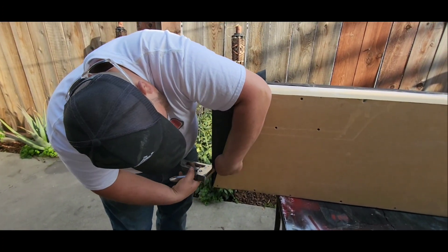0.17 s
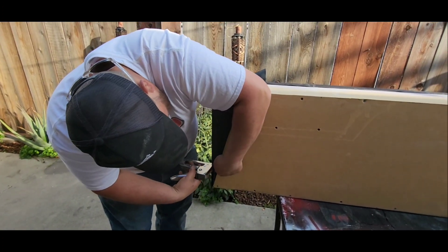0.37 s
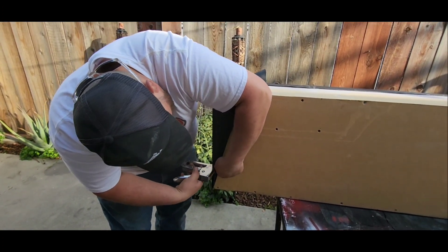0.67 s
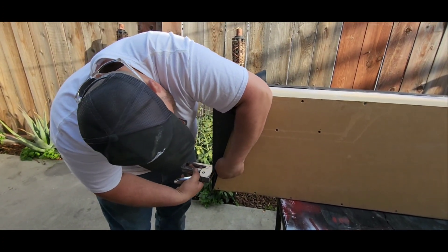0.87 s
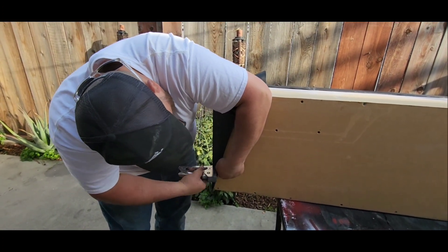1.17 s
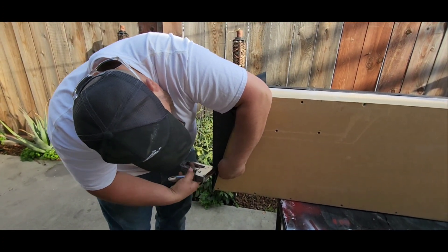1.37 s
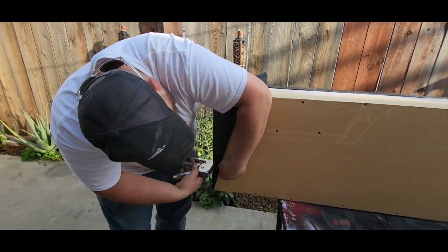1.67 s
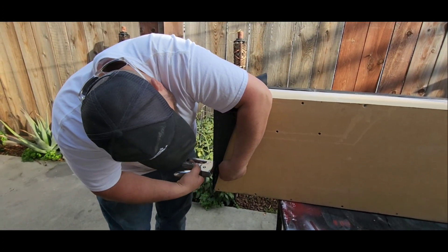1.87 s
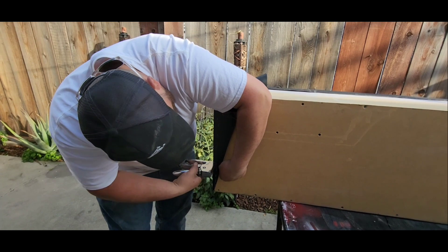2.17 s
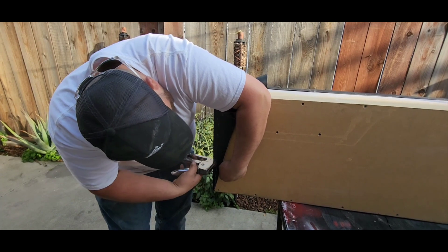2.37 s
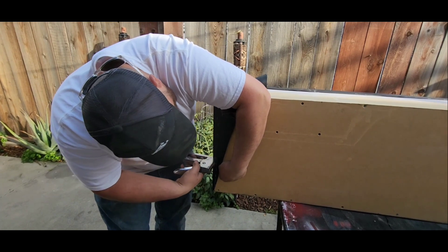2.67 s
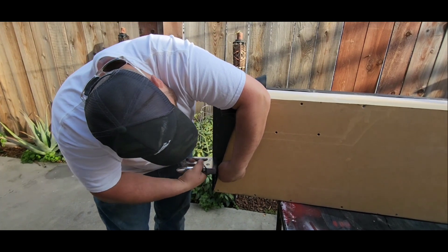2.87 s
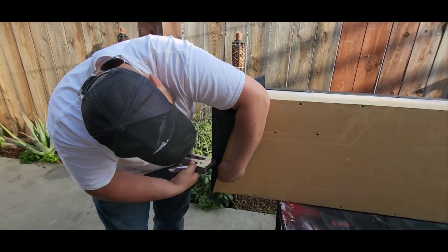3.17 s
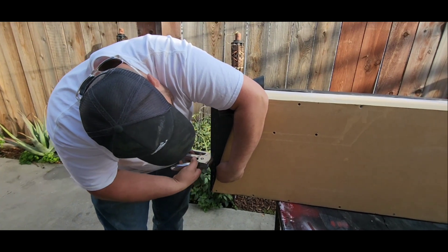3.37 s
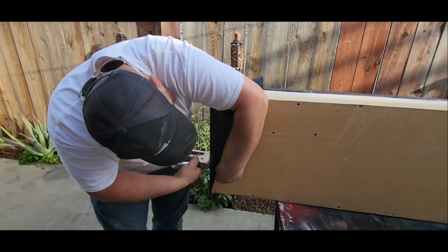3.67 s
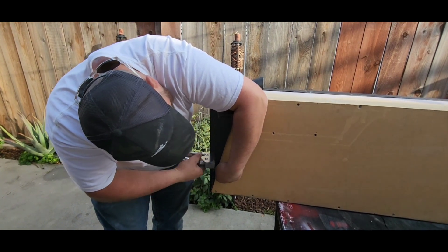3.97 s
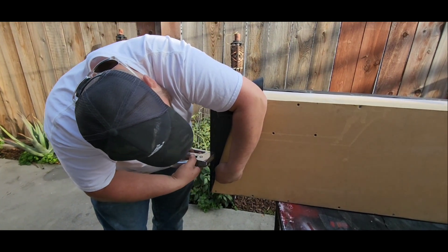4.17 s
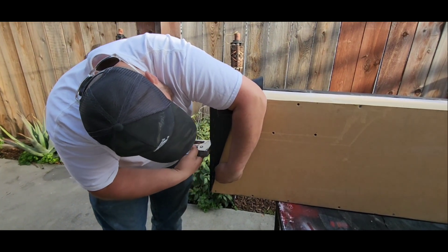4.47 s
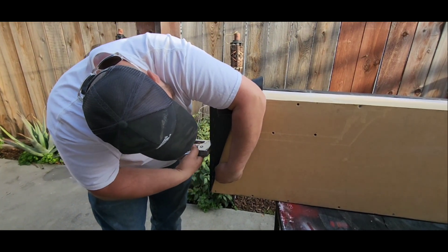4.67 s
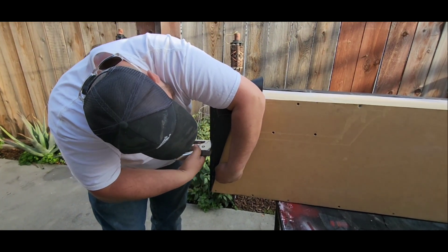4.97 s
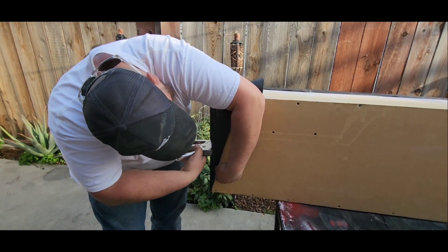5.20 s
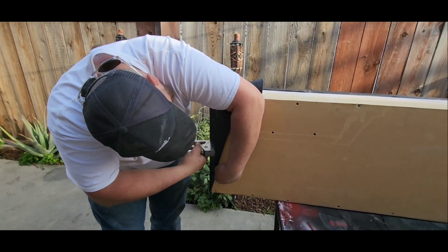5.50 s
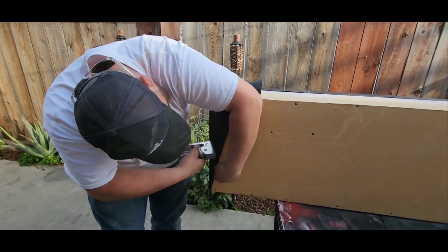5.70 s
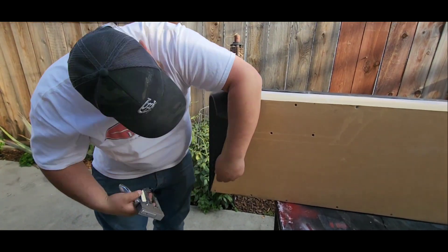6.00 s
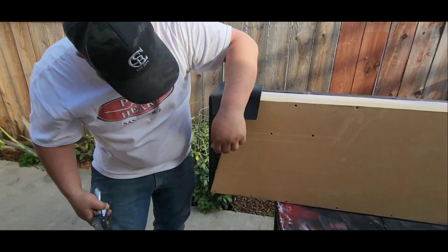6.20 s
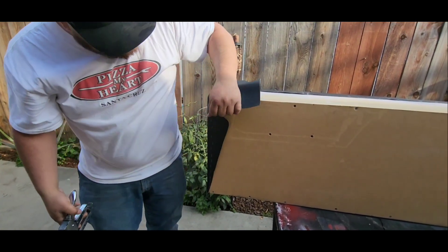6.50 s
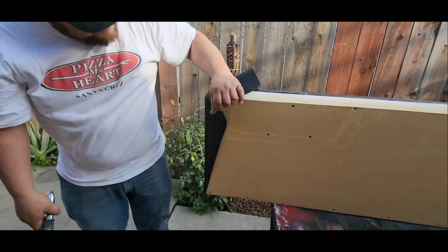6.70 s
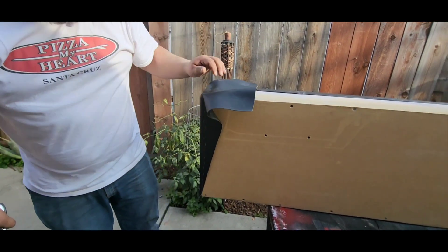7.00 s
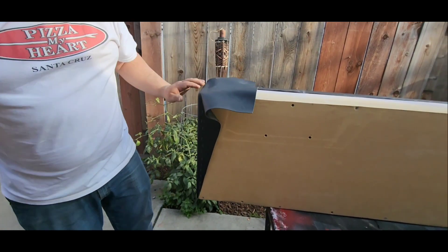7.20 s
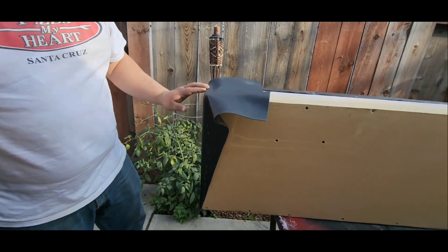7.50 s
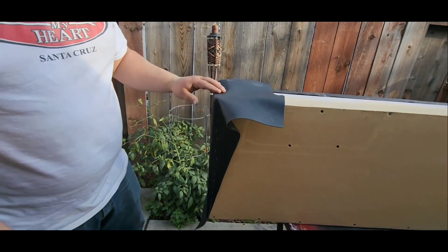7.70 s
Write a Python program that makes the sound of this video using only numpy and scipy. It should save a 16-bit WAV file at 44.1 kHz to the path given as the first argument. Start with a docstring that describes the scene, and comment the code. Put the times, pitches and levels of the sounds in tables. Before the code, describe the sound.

A quiet fenced yard outdoors, heard close in stereo, with low distant rumble, faint traffic and slight wind. A hand staple gun tacks rubber sheet to a hollow wooden box. Shots crack at about 0.2, 1.75, 2.65, 3.6, 4.5 and 6.2 seconds. Before each, the spring creaks faintly, a pawl ticks and a latch clicks; then comes a very loud, bright steel snap with a low wooden boom, brief rattle and short outdoor scatter. About 0.2 seconds later the lever clacks to its stop and the striker catches with a smaller click. Between shots are light metal ticks, dull nose taps and soft box knocks, notably near 3.1, 4.1 and 5.1. A car passes faintly around 6.3. Loose ticks follow until 6.9, then a hand brushes rubber at 7.15. Very faint far whistles and a low engine hum remain, with slight shirt rustle at the end.

```python
"""Stapling a rubber sheet outdoors

A hand staple gun tacks rubber sheet to a wooden box in a fenced yard, six times.
Each stroke: creaking spring, pawl tick, latch click, striker crack, box boom, lever clack and catch.
Struck steel and panels are sums of decaying modes; friction, rebound and scatter are shaped noise.
Late on a hand brushes the loose sheet; far traffic, an engine, whistles and a little wind lie beneath."""
import sys
import numpy as np
from scipy import signal
from scipy.fft import rfft, irfft, next_fast_len
from scipy.io import wavfile

SR = 44100
rng = np.random.default_rng(int(sys.argv[2]) if len(sys.argv) > 2 else 0)


def dump_mix(stems):
    """Bounce the given channels to the path in sys.argv[1] as a 16-bit WAV at rate SR."""
    frames = np.atleast_2d(stems).T  # one column per channel
    limited = np.clip(frames, -1, 1)  # hard clip at full scale
    pcm = np.round(limited * 32767).astype(np.int16)
    wavfile.write(sys.argv[1], SR, pcm)


N = 346185  # length in samples
TIME = np.arange(N) / SR
AGE = np.arange(16000) / SR  # time since a blow (s); every blow is computed for this long


def from_db(db):
    """Logarithmic level: decibels to amplitude gain."""
    return 10 ** (np.asarray(db) / 20)


def rms_one(x):
    """Power normalization: scale to rms 1."""
    return x / np.sqrt(np.mean(x ** 2) + 1e-20)


def in_time(rows, axis=1):
    """Linear interpolation: one column of a curve at every sample."""
    rows = np.array(rows)
    return np.interp(TIME, rows[:, 0], rows[:, axis])


def at_hz(points, hz):
    """Logarithmic pitch: interpolate a table along a log-frequency axis."""
    points = np.array(points)
    return np.interp(np.log(np.maximum(hz, 1)), np.log(points[:, 0]), points[:, 1])


def add(out, s, sound):
    """Superposition: mix a sound in at time s."""
    start = round(s * SR)
    part = sound[..., :N - start]
    out[:, start:start + part.shape[-1]] += part


def panned(db):
    """Interchannel level difference: left and right gains that lie db apart."""
    return from_db(np.array([[.5], [-.5]]) * db)


def fade(t60, rise, delay=0):
    """Exponential decay: quick rise, then a fall of 60 dB per t60."""
    age = np.maximum(AGE - delay, 0)
    decay = np.exp(-np.minimum(np.log(1000) * age / t60, 20))
    return (1 - np.exp(-age / rise)) * decay


def noise(spectrum, likeness, size, tilt_db=0, lag=0, balance=None):
    """Partial coherence: coloured stereo noise of rms 1, mixed from a common and an opposed part."""
    padded = next_fast_len(size, True)
    hz = np.fft.rfftfreq(padded, 1 / SR)
    mid, side = rfft(rng.standard_normal((2, padded)))
    alike = np.clip(at_hz(likeness, hz), 0, 1)
    pair = np.sqrt(1 + alike) * mid + np.sqrt(1 - alike) * side * [[1], [-1]]
    pair[1] *= np.exp(-2j * np.pi * hz * lag)  # the right channel lags
    if balance is not None:
        pair *= panned(at_hz(balance, hz))
    low_end = 1 + (spectrum[0][0] / (hz + 1)) ** 6
    high_end = 1 + (hz / spectrum[-1][0]) ** 12
    ends = 1 / np.sqrt(low_end * high_end)  # roll-off outside the table
    tilt = tilt_db * np.log2(np.maximum(hz, 1000) / 4000)  # dB per octave above 1 kHz
    colour = from_db(at_hz(spectrum, hz) + tilt)
    return rms_one(irfft(pair * ends * colour)[:, :size])


def rough(size, rough_db, count=110):
    """Amplitude modulation: a gain of rms 1 that heads for a new random level every count samples."""
    knots = rng.standard_normal(size // count + 2)
    wander = np.interp(np.arange(size) / count, np.arange(len(knots)), knots)
    return rms_one(from_db(rough_db * wander))


def tone(hz, waver_hz, size, count=2000):
    """Frequency modulation: a sine of rms 1 whose pitch takes a new turn every count samples."""
    knots = rng.standard_normal(size // count + 2)
    wander = np.interp(np.arange(size) / count, np.arange(len(knots)), knots)
    return np.sqrt(2) * np.sin(2 * np.pi * np.cumsum(hz + waver_hz * wander) / SR)


def swell(s, half_s):
    """Gaussian envelope: a smooth rise and fall of gain around time s."""
    return np.exp(-np.minimum(((TIME - s) / half_s) ** 2, 30))


def swells(rows):
    """Superposition of envelopes: the gain of a series of swells."""
    return sum(from_db(db) * swell(s, half_s) for s, half_s, db in rows)


# Likeness of the channels in scattered sound. Each row: frequency in Hz, correlation from 0 to 1.
DIFFUSE_CORRELATION = [(30, 0.88), (200, 0.97), (600, 0.47), (1300, 0.035), (3000, 0.042), (14000, 0.04)]


def wash(spectrum, gain):
    """Diffuse field: broad, scattered noise that follows a gain."""
    return gain * noise(spectrum, DIFFUSE_CORRELATION, N)


# Spectra of the low rumble, of wind at the microphones and of far roads.
# Each row: frequency in Hz, relative level in dB per Hz.
RUMBLE_SPECTRUM = [(25, -19.5), (45, -17), (125, -1.5), (200, -2.5), (260, -8.5), (400, -17), (630, -29),
                   (800, -21), (1300, -30.5), (2000, -32), (3200, -41.5), (5000, -42.5), (9500, -65),
                   (16000, -64.5)]
WIND_SPECTRUM = [(22, -16), (40, -4.5), (55, -1.5), (100, -4.5), (140, -13), (300, -31)]
TRAFFIC_SPECTRUM = [(300, 4), (600, 1), (820, 2.5), (1300, -4.5), (1900, 0), (2600, -14), (3400, -13),
                    (4200, -28.5), (7000, -29.5)]
# Gusts at the microphones. Each row: centre in seconds, half length to 1/e in seconds, level in dB.
GUSTS = [(1.03, 0.157, -45.5), (1.39, 0.06, -46.5), (6.1, .2, -50.5), (7.5, .6, -57.5)]
# Far engine. Each row: time in seconds, level of its second order in dB, level of its third in dB.
ENGINE_LEVELS = [(0, -65.5, -67.5), (6.3, -59.5, -63.5), (6.6, -49.5, -68), (7.25, -46.5, -77),
                 (7.38, -58.5, -75), (7.5, -42, -56.5), (7.85, -51, -40.5)]
# Faint far whistles. Each row: start in seconds, length in seconds, pitch in Hz, level in dB.
WHISTLES = [(6.05, 0.16, 1500, -61), (6.52, 0.19, 1493, -68), (7.07, 0.18, 1470, -65),
            (7.33, 0.21, 1336, -65.5)]
RUMBLE_DB, BREEZE_DB, ROADS_DB = -53.5, -57, -68.5  # steady background
# one far car: nearest moment, time to cover its own nearest distance, level when nearest
CAR_NEAREST_S, CAR_PASS_S, CAR_DB = 6.3, 0.87, -59.5
ENGINE_HZ = 39.03  # first order


def outdoors():
    """Spherical spreading and harmonic orders: rumble, gusts, a passing car, an engine, whistles."""
    car = from_db(CAR_DB) / np.hypot(1, (TIME - CAR_NEAREST_S) / CAR_PASS_S)  # level falls as 1 / distance
    out = wash(RUMBLE_SPECTRUM, from_db(RUMBLE_DB) * rough(N, rough_db=1.5, count=6000))
    wind = wash(WIND_SPECTRUM, from_db(BREEZE_DB) + swells(GUSTS))
    out += wind + wash(TRAFFIC_SPECTRUM, np.hypot(from_db(ROADS_DB), car))
    out += from_db(in_time(ENGINE_LEVELS, axis=1)) * tone(2 * ENGINE_HZ, 1.3, N)
    out += from_db(in_time(ENGINE_LEVELS, axis=2)) * tone(3 * ENGINE_HZ, 1.5, N)
    for s, length, hz, db in WHISTLES:
        size = int(length * SR)
        add(out, s, from_db(db) * np.hanning(size) * tone(hz, 10.0, size))
    return out


# Likeness of the channels in direct sound. Each row: frequency in Hz, correlation from 0 to 1.
DIRECT_CORRELATION = [(200, 0.98), (1500, 0.56), (14000, 0.18)]
# Balance of the gun between the channels. Each row: frequency in Hz, left minus right in dB.
GUN_BALANCE = [(300, 2), (700, 7), (1400, -4.5), (2600, -10), (5000, 1.5), (9000, 16), (14000, -5.5)]
RIGHT_LAG_S = 0.00014


def direct(spectrum, tilt_db=0):
    """Interchannel delay: noise that comes straight from the gun and reaches the left first."""
    return noise(spectrum, DIRECT_CORRELATION, len(AGE), tilt_db, RIGHT_LAG_S, GUN_BALANCE)


# Resonances of the steel body and lever.
# Each row: centre frequency in Hz, bandwidth in Hz, level in dB, the first and last varied per touch.
STEEL_MODES = [(1550, 68, -13), (2010, 150, 2), (2020, 190, 1), (2330, 260, -3.5), (2940, 53, -9.5),
               (3230, 450, -3.5), (4890, 420, -2.5), (5120, 580, -5.5), (5330, 260, -2.5), (6300, 360, 0),
               (7900, 330, -13), (11300, 900, -18), (13000, 2500, -18.5)]


def steel(force, spread_db=2.5, grip=0.022):
    """Modal superposition: parallel resonators, shifted and weighted anew by the grip at each touch."""
    out = 0
    variations = rng.standard_normal((len(STEEL_MODES), 2))
    for k, ((hz, width, db), (shift, weight)) in enumerate(zip(STEEL_MODES, variations)):
        r = np.exp(-np.pi * width / SR)  # pole radius
        poles = [1, -2 * r * np.cos(2 * np.pi * hz * (1 + grip * shift) / SR), r * r]
        zeros = np.array([1, 0, -1]) * (1 - r * r) / 2  # near-unit gain at resonance
        gain = (-1) ** k * from_db(db + spread_db * weight)
        out = out + gain * signal.lfilter(zeros, poles, force)
    return out


# The latch takes up the spring. Each row: time in seconds, click level in dB relative to the common
# latch gain, rebound in dB, brightness in dB per octave, level of the creak before it in dB.
LATCH_CLICKS = [(0.1486, -23, -3.5, -1, -54.5), (1.705, -25, -5.5, -4, -66.5), (2.6128, -26, -9.5, -3, -59),
                (3.5336, -27.5, -11, -3, -67), (4.4282, -27, -12.5, -1.5, -59.5),
                (6.168, -19.5, -11.5, -2.5, -61)]
# Spectrum of the rub under a creak and of the noise leading into a crack.
# Each row: frequency in Hz, relative level in dB per Hz.
RUB_SPECTRUM = [(400, -16.5), (1500, -12.5), (2500, -5), (4000, -3.5), (7000, -3.5), (9500, -13),
                (15000, -16)]
# The two notes of the creaking spring in Hz.
CREAK_NOTES_HZ = (1860, 4760)
CREAK_S = .13  # the creak ends at the latch click


def creaks(waver_hz=150, low_db=-4, high_db=-10, rub_db=2):
    """Stick-slip friction: the squeezed spring gives two broken notes and a rub growing with the load."""
    out, size = np.zeros((2, N)), int(CREAK_S * SR)
    load = np.linspace(0, 1, size)
    for s, *_, creak_db in LATCH_CLICKS:
        creak = from_db(rub_db) * load * steel(direct(RUB_SPECTRUM)[:, :size])
        for hz, db in zip(CREAK_NOTES_HZ, (low_db, high_db)):
            breaks = np.sqrt(np.hanning(size)) * rough(size, rough_db=8.5, count=900)
            notes = np.array([tone(hz, waver_hz, size, count=70) for channel in range(2)])
            creak += from_db(db) * breaks * notes
        creak = creak * rough(size, rough_db=5.5)
        add(out, max(s - CREAK_S, 0), from_db(creak_db) * creak[:, -int(s * SR):])
    return out


# Decay of the yard. Each row: frequency in Hz, t60 in seconds.
YARD_T60 = [(120, 0.43), (400, 0.15), (1000, 0.26), (3000, 0.24), (7500, 0.22), (14000, 0.2)]


def yard(spectrum, tilt_db, rise=0.0045, delay=.003):
    """Reverberation: scatter from box, ground and fence, each octave dying at its own rate."""
    bins = rfft(noise(spectrum, DIFFUSE_CORRELATION, len(AGE), tilt_db))
    hz = np.fft.rfftfreq(len(AGE), 1 / SR)
    centres = 125 * 2 ** np.arange(8)
    out = 0
    for centre, row in zip(centres, np.eye(len(centres))):
        share = at_hz(np.c_[centres, row], hz)  # overlapping triangular bands
        out = out + irfft(bins * share) * fade(at_hz(YARD_T60, centre), rise, delay)
    return out


# Long thin ring of the leaf spring.
# Each row: frequency in Hz, level in dB, t60 in seconds, the first two varied and t60 capped by the grip.
SPRING_MODES = [(1878, -39, .26), (1946, -35.5, 0.38), (2174, -36, 0.36), (2490, -42.5, 0.58),
                (3180, -35, 0.23), (3600, -40, .22), (4360, -38.5, .25), (5260, -39, 0.22),
                (5080, -40.5, 0.26), (6260, -41, 0.47), (7470, -37.5, 0.18), (8140, -36, 0.12),
                (11200, -41, 0.18)]
GRIP_T60 = .21  # longest ring under the grip (s)


def spring(spread_db=3.5, grip=.012):
    """Damped modes: thin steel tones, detuned by the grip, with strength and phase set per channel."""
    hz, db, t60 = np.transpose(SPRING_MODES)[:, :, None, None]
    hz = hz * (1 + grip * rng.standard_normal(hz.shape))
    strength = from_db(db + spread_db * rng.standard_normal((len(SPRING_MODES), 2, 1)))
    envelope = fade(np.minimum(t60, GRIP_T60), 0.00045)
    cycles = hz * AGE + rng.random(strength.shape)
    return np.sum(strength * envelope * np.sin(2 * np.pi * cycles), axis=0)


def bending_wave(start_hz=1350, fall_s=.015, t60=0.049, rise=0.011):
    """Dispersion: the first wave through the panel arrives spread out as a quick falling chirp."""
    hz = start_hz / (1 + AGE / fall_s) ** 2
    return fade(t60, rise) * np.sin(2 * np.pi * np.cumsum(hz) / SR)


# Spectrum of steel meeting steel. Each row: frequency in Hz, relative level in dB per Hz.
CONTACT_SPECTRUM = [(200, -11), (700, -17.5), (1200, -4.5), (3000, 7.5), (7000, 1), (9500, -5.5),
                    (12000, 3), (15500, -7.5)]
REBOUND_S = .0043


def clicks(rows, common_db, t60, bare_db, yard_db, spring_db, wave_db):
    """Impact and rebound: two touches, heard bare and through gun, spring, box panel and yard."""
    out = np.zeros((2, N))
    # yard, spring and panel answer alike for all rows
    answer = from_db(yard_db) * yard(CONTACT_SPECTRUM, tilt_db=-0.5)
    after = from_db(spring_db) * spring() + from_db(wave_db) * bending_wave()
    for s, db, rebound_db, tilt_db, pan_db in rows:
        touch = fade(t60, 0.00009) + from_db(rebound_db) * fade(t60, 0.00038, REBOUND_S)
        pan = panned(pan_db / 2)  # half the listed difference, on top of the gun's balance
        force = direct(CONTACT_SPECTRUM, tilt_db) * touch * pan + answer
        add(out, s, from_db(db + common_db) * (steel(force) + from_db(bare_db) * force + after))
    return out


# The pawl drops in. Each row: time in seconds, level in dB relative to the common pawl gain.
PAWL_TICKS = [(0.101, -36.5), (1.6699, -30.5), (2.5666, -39.5), (3.5002, -31.5), (4.369, -36),
              (6.129, -29.5)]


def pawls(rebound_db=-20, tilt_db=5, pan_db=-10):
    """Light impact: shortly before each latch click the pawl drops in with a thin, bright tick."""
    rows = [(s, db, rebound_db, tilt_db, pan_db) for s, db in PAWL_TICKS]
    return clicks(rows, common_db=-1.0, t60=0.0106, bare_db=-10.5, yard_db=-12.5,
                  spring_db=-2, wave_db=-26.5)


def latches(pan_db=-3):
    """Impact excitation: the latch takes up the spring with a hard, ringing click."""
    rows = [(s, db, rebound_db, tilt_db, pan_db) for s, db, rebound_db, tilt_db, _ in LATCH_CLICKS]
    return clicks(rows, common_db=14.5, t60=.016, bare_db=-12.0, yard_db=-20.0,
                  spring_db=-2, wave_db=-23)


# Panels of the box. Each row: frequency in Hz, level in dB before a random spread, t60 in seconds.
BOX_MODES = [(128.4, -30.5, 0.51), (151, -38.5, 0.55), (170.7, -35, 0.84), (185.2, -26.5, 0.33),
             (228, -28, 0.28), (264.5, -30.5, 0.38), (278.7, -34, 0.36), (358, -35.5, 0.14),
             (395, -34, 0.079), (497, -27, 0.15), (672, -40, 0.24), (759, -39, .22), (975, -40, 0.086),
             (1017, -41, 0.17), (1069, -42.5, 0.35), (1254, -51.5, 0.17), (1472, -41, 0.13)]


def box(rise=.003, travel_s=0.003505, spread_db=1.6):
    """Dispersive panel modes: bending waves are slower at low pitch, so low modes start later."""
    hz, db, t60 = np.transpose(BOX_MODES)[:, :, None]
    delay = travel_s * np.sqrt(1000 / hz)  # travel_s is the delay at 1 kHz
    strength = from_db(db + spread_db * rng.standard_normal(hz.shape))
    swing = np.sin(2 * np.pi * hz * (AGE - delay))
    return np.sum(strength * fade(t60, rise, delay) * swing, axis=0)


# The staples. Each row: time in seconds, crack in dB, yard ring in dB, box boom in dB,
# short swell of noise before the crack in dB, brightness in dB per octave.
STAPLES = [(0.202, -6, -19, -3.5, -14, -0.74), (1.7460, -5.5, -18.5, -2, -14, -0.5),
           (2.6591, -2.5, -21.5, -2.5, -17.5, 0), (3.5860, -3.5, -20.5, -3.5, -15, 0),
           (4.5036, -4, -21, -2, -19, -1), (6.2140, -6, -15.5, -3, -19, -1)]
# Spectra of the crack and of its scatter. Each row: frequency in Hz, relative level in dB per Hz.
CRACK_SPECTRUM = [(150, -20.5), (500, -7.5), (1300, -12), (1900, -1), (3100, -3), (5200, 3), (6300, -5),
                  (8300, -4.5), (9200, -14), (12000, -3.5), (15500, -10.5)]
YARD_SPECTRUM = [(110, -1.5), (250, 6.5), (350, -3), (500, 2), (650, -6), (1250, -7.5), (2000, -2),
                 (3000, 1), (4000, -3.5), (5300, -2.5), (6200, -7), (8300, -8.5), (9200, -13.5),
                 (12000, -8), (15900, -10)]


def shots(crack_t60=.012, seat_s=.0009, seat_db=-3, judder_db=-8, judder_t60=0.031,
          steel_db=-6, lead_t60=0.036, wave_db=-15):
    """Impact: a short rising noise leads into the crack; the striker hits, seats the staple and judders."""
    out = np.zeros((2, N))
    for s, crack_db, yard_db, box_db, lead_db, tilt_db in STAPLES:
        blow = fade(crack_t60, 0.00029)
        blow = blow + from_db(seat_db) * fade(crack_t60 / 2, 0.00016, seat_s)
        blow = np.hypot(blow, from_db(judder_db) * fade(judder_t60, .001, 0.0036))
        crack = direct(CRACK_SPECTRUM, tilt_db) * blow
        body = from_db(steel_db) * steel(direct(CONTACT_SPECTRUM) * blow)
        add(out, s, from_db(crack_db) * (crack + body) + spring())

        scatter = from_db(yard_db) * yard(YARD_SPECTRUM, tilt_db) * rough(len(AGE), rough_db=1.5)
        boom = from_db(box_db) * (box() + from_db(wave_db) * bending_wave())
        add(out, s, scatter + boom)

        growth = fade(lead_t60, .0003)[:SR // 20][::-1]  # reversed: grows up to the crack
        lead_in = direct(RUB_SPECTRUM)[:, :len(growth)] * growth
        add(out, s - len(growth) / SR, from_db(lead_db) * (from_db(-5) * lead_in + steel(lead_in)))
    return out


# loose parts after a shot: mean touches per second, level against the crack (dB), decay (s)
CHATTER_PER_S, CHATTER_DB, CHATTER_T60 = 260, -12.5, .17


def chatter(spread_db=4, bare_db=-6):
    """Random impact train: recoil shakes magazine and lever in a dying run of uneven touches."""
    out, size = np.zeros((2, N)), len(AGE)
    for s, crack_db, *_ in STAPLES:
        happens = rng.random(size) < CHATTER_PER_S / SR
        touches = happens * from_db(spread_db * rng.standard_normal(size))
        grain = fade(.004, .0001)[:SR // 100]
        contact = direct(CONTACT_SPECTRUM)
        force = contact * signal.fftconvolve(touches * fade(CHATTER_T60, .004), grain)[:size]
        add(out, s, from_db(crack_db + CHATTER_DB) * (steel(force) + from_db(bare_db) * force))
    return out


# The box shifts on its stand.
# Each row: time in seconds, boom in dB relative to the common boom gain, contact in dB.
BOX_KNOCKS = [(0.318, -27, -27), (3.116, -25, -34), (4.069, -13, -30), (4.659, -19, -16), (6.326, -16, -15)]


def knocks(scuff_db=-24, scuff_t60=0.089, wave_db=-16, boom_db=-3, soft_hz=380):
    """Soft excitation: a slow push favours the low modes; hard contact adds a chirp and a dull scuff."""
    out = np.zeros((2, N))
    soften = signal.butter(2, soft_hz, fs=SR, output="sos")
    for s, db, contact_db in BOX_KNOCKS:
        scuff = direct([(200, 5), (700, -43), (2000, -16)]) * fade(scuff_t60, 0.0033)  # (Hz, dB per Hz)
        contact = from_db(wave_db) * bending_wave() + from_db(scuff_db) * scuff
        boom = signal.sosfilt(soften, box())
        add(out, s, from_db(db + boom_db) * boom + from_db(contact_db) * contact)
    return out


# The lever reaches its stop, then catches the striker again.
# Each row: time in seconds, level in dB relative to the common release gain.
LEVER_STOPS = [(0.4079, -29), (1.917, -26.5), (2.827, -26.5), (3.7689, -24.5), (4.712, -25), (6.4027, -26)]
STRIKER_CATCHES = [(0.458, -33), (1.9662, -27), (2.8921, -41), (3.806, -28), (4.7694, -48), (6.427, -18.5)]


def releases(stop_rebound_db=-5, stop_tilt_db=-0.8, stop_pan_db=-3,
             catch_rebound_db=.8, catch_tilt_db=-2.2, catch_pan_db=-4):
    """Elastic return: the lever springs to its stop, then hooks the striker with a duller double click."""
    stops = [(s, db, stop_rebound_db, stop_tilt_db, stop_pan_db) for s, db in LEVER_STOPS]
    catches = [(s, db, catch_rebound_db, catch_tilt_db, catch_pan_db) for s, db in STRIKER_CATCHES]
    return clicks(stops + catches, common_db=-1.2, t60=.02, bare_db=-8, yard_db=-17.5,
                  spring_db=3, wave_db=-33.0)


# Hand strokes over the sheet, the fainter one as the fingers slide off its edge; rustles of the shirt.
# Each row: centre in seconds, half length to 1/e in seconds, level in dB.
HAND_STROKES = [(7.155, 0.098, -47), (7.37, 0.054, -66)]
SHIRT_RUSTLES = [(0.89, 0.1, -75), (5.85, .2, -79.5), (6.55, 0.38, -72.5), (7.85, 0.4, -68.5)]
# Spectra of hand on rubber and of cloth. Each row: frequency in Hz, relative level in dB per Hz.
BRUSH_SPECTRUM = [(700, 0), (1500, -1), (2600, -1.5), (3600, 2), (4300, 1.5), (5400, 5), (6800, -10.5),
                  (15000, -18.5)]
CLOTH_SPECTRUM = [(1500, -5.5), (3000, 3), (5000, 6), (8000, -2.5), (15000, -17)]


def handling():
    """Sliding friction: a hand brushes over the rubber sheet and the shirt rustles."""
    brush = wash(BRUSH_SPECTRUM, swells(HAND_STROKES)) * rough(N, rough_db=2.0, count=160)
    rustle = wash(CLOTH_SPECTRUM, swells(SHIRT_RUSTLES)) * rough(N, rough_db=2.0)
    return brush + rustle


# Loose parts tick as the gun is moved. Each row: time in seconds, level in dB relative to the common
# tick gain, brightness in dB per octave, left minus right in dB before halving.
LOOSE_TICKS = [(0.893, -44.5, -13, -6), (0.9333, -49, -1, 4), (1.179, -53.5, -10, -6),
               (1.5643, -51.5, -4, 1), (2.2355, -38.5, -4.5, 0), (2.3333, -43.5, -2.5, 5),
               (3.132, -43, 0, -7), (3.36, -55.5, -3, -5), (4.038, -44, -9.5, -1.5),
               (4.0737, -35, 4.5, -6.5), (5.1463, -39.5, 1.5, -1), (5.68, -50.5, -6, -6),
               (5.9949, -27, 1.5, 9), (6.444, -25.5, -1, -1), (6.562, -38.5, 3.5, 8),
               (6.9139, -35, -1.5, 10), (6.9242, -34.5, 3, -4)]


def ticks(rebound_db=-6.0):
    """Rattle by impact: lever and magazine touch lightly as the gun is moved."""
    rows = [(s, db, rebound_db, tilt_db, pan_db) for s, db, tilt_db, pan_db in LOOSE_TICKS]
    return clicks(rows, common_db=0.65, t60=0.025, bare_db=-14.5, yard_db=-17.0,
                  spring_db=-1.5, wave_db=-33.0)


# The nose of the gun is set on the rubber or bumps the hand. Each row: time in seconds, level in dB.
NOSE_TAPS = [(2.235, -45.5), (3.1155, -40), (4.067, -40), (5.138, -43), (6.517, -38.5)]
# Spectrum of a tap. Each row: frequency in Hz, relative level in dB per Hz.
TAP_SPECTRUM = [(600, -11), (1100, -4), (1600, 5), (2400, -3), (5000, -14), (12000, -28)]


def taps(t60=0.026, rise=0.0013):
    """Damped impact: steel on something soft gives a short dull tick with no ring."""
    out = np.zeros((2, N))
    for s, db in NOSE_TAPS:
        add(out, s, from_db(db) * direct(TAP_SPECTRUM) * fade(t60, rise))
    return out


def scene():
    """Linear superposition: gun, box, handling and yard together."""
    gun = creaks() + pawls() + latches() + shots() + chatter() + releases() + ticks()
    return gun + knocks() + taps() + handling() + outdoors()


CUTOFF_HZ = 15750


def record(dry, top=0.65):
    """Saturation and band limiting: the loudest peaks are rounded, the top is cut."""
    rounded = top * np.tanh(dry / top)
    low_pass = signal.ellip(10, .1, 80, CUTOFF_HZ, fs=SR, output="sos")
    return signal.sosfilt(low_pass, rounded)


dry = scene()
out = record(dry)
dump_mix(out)
```